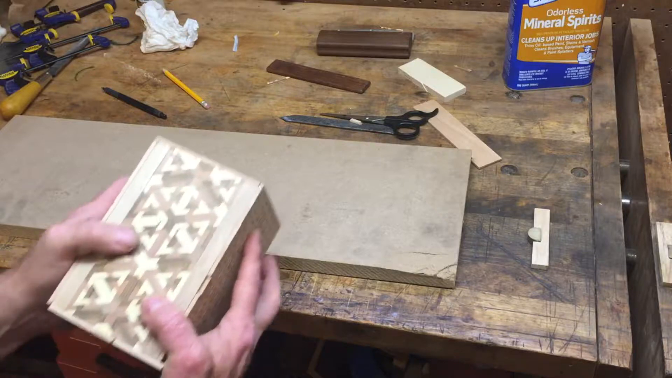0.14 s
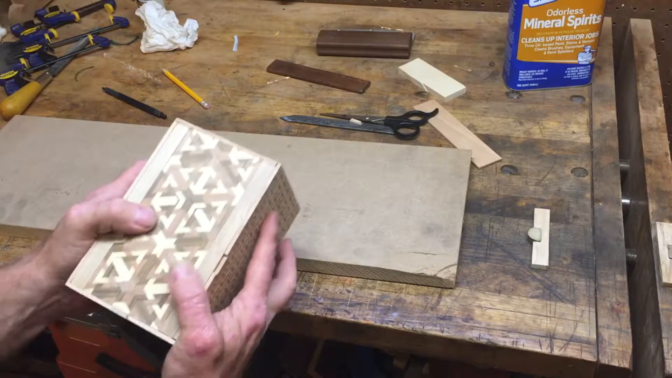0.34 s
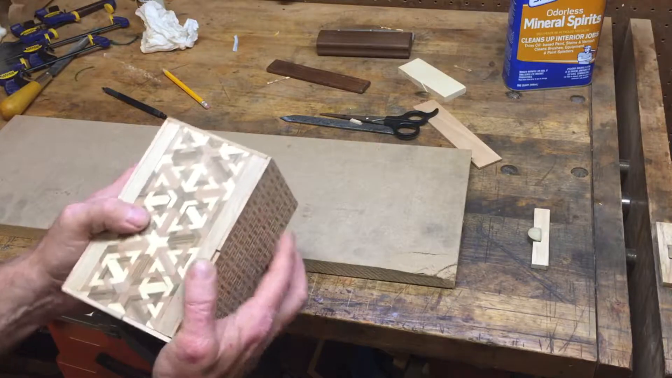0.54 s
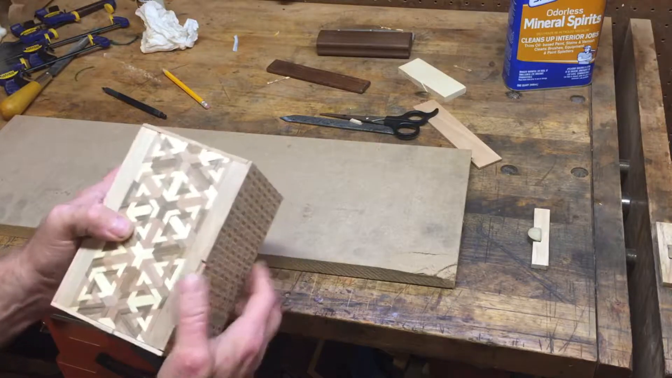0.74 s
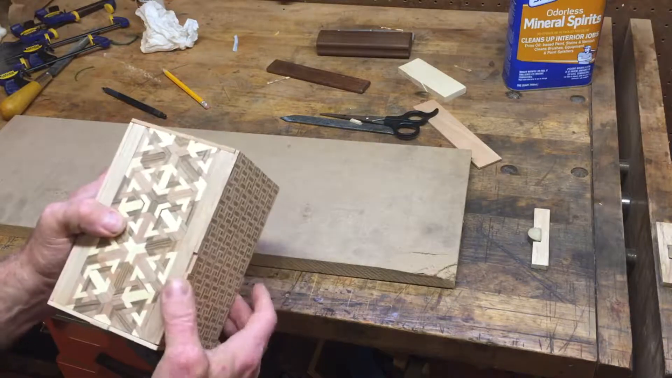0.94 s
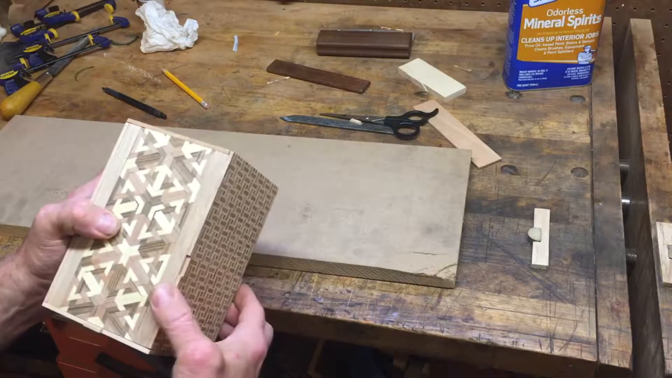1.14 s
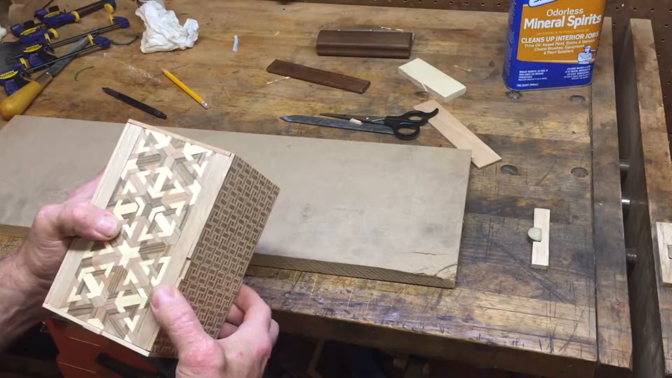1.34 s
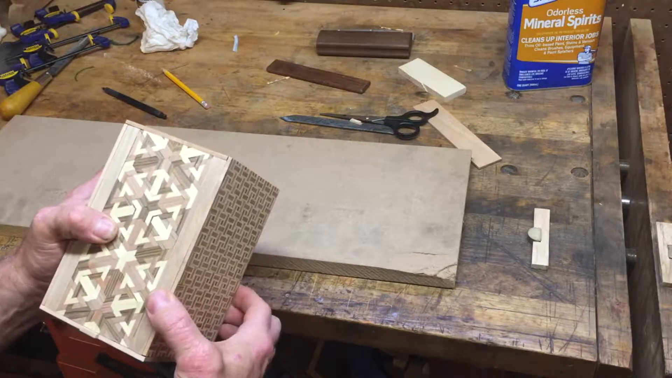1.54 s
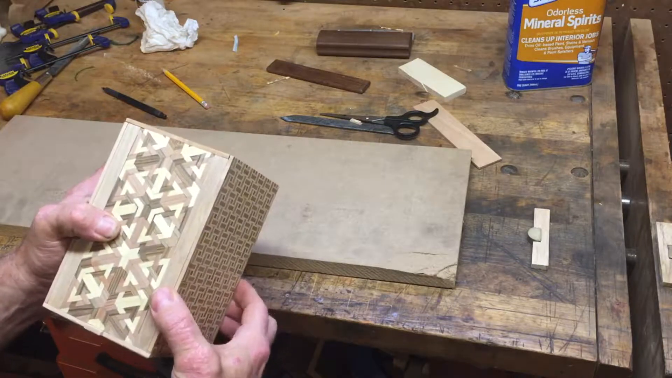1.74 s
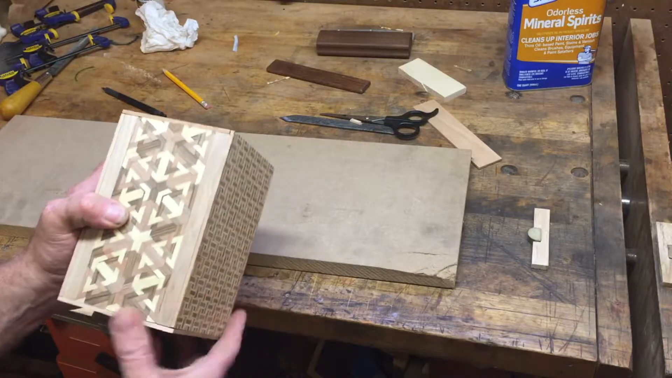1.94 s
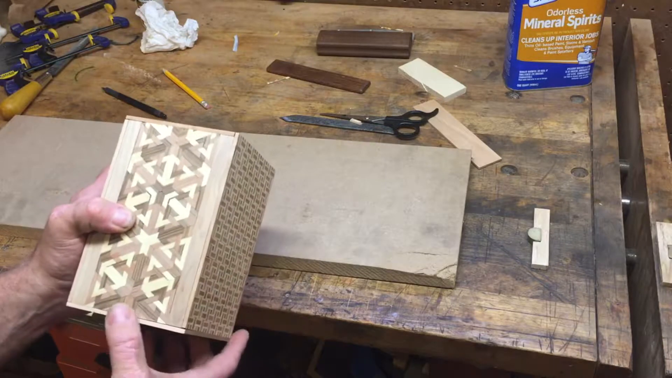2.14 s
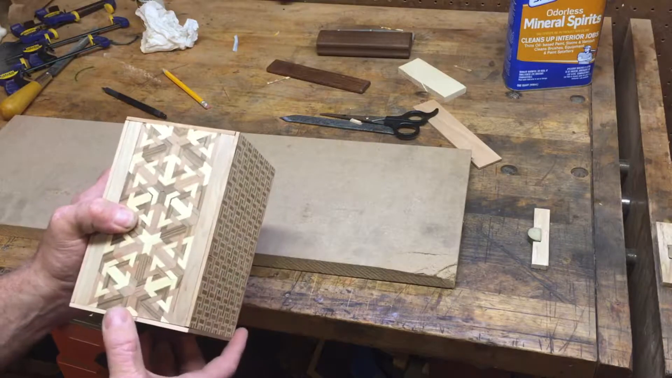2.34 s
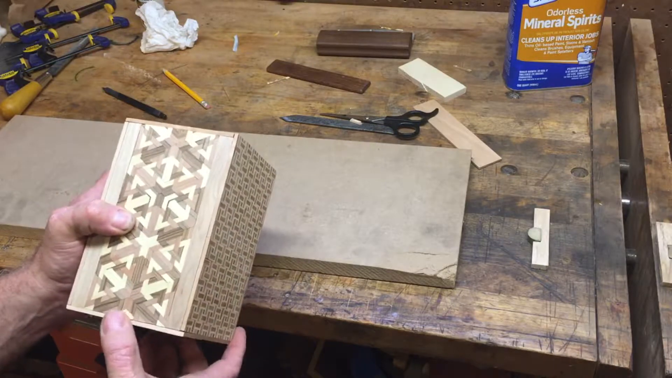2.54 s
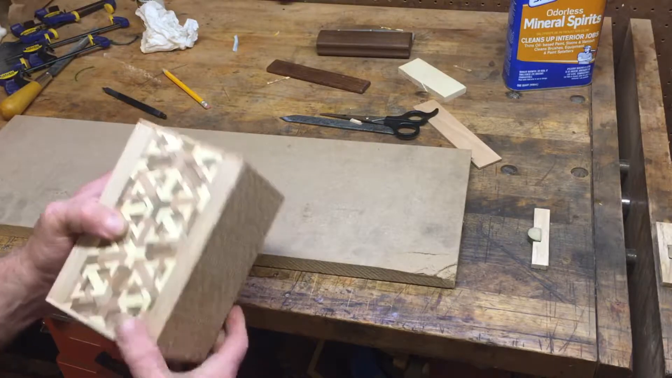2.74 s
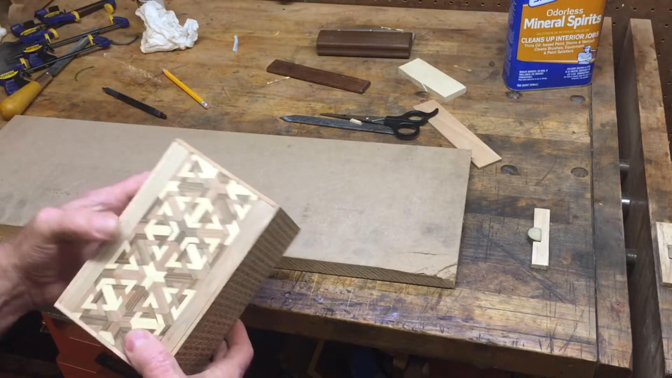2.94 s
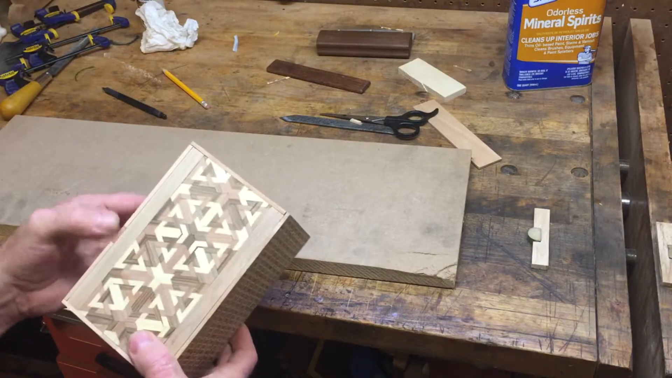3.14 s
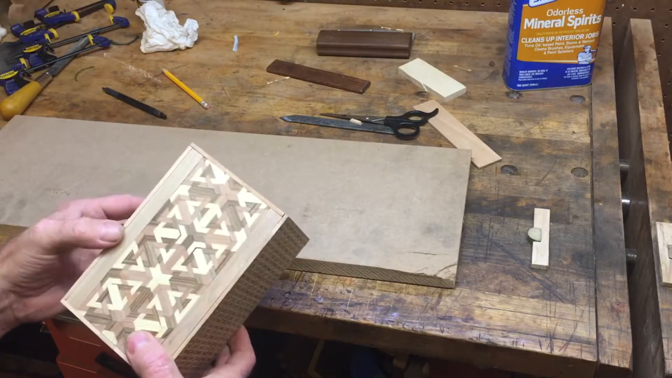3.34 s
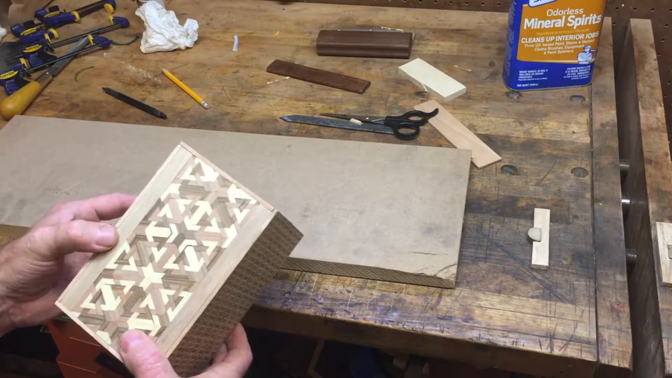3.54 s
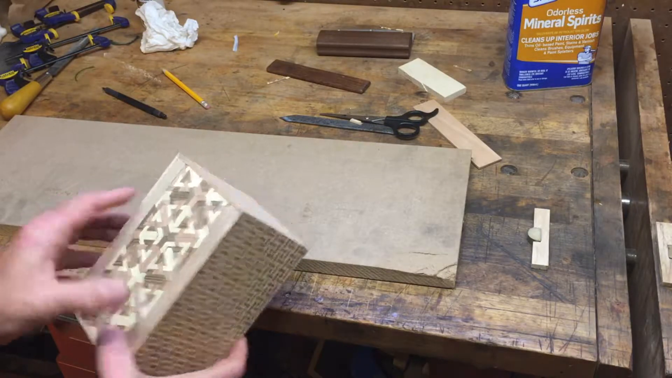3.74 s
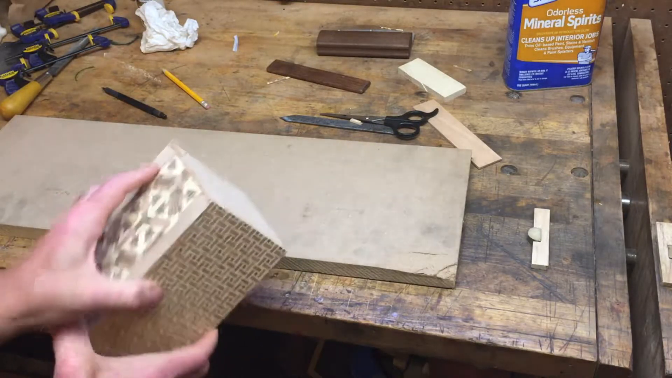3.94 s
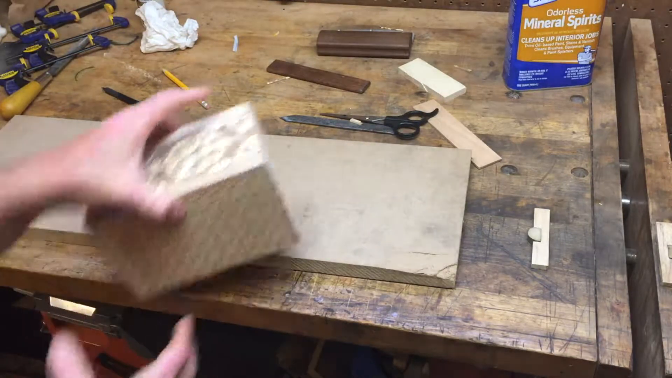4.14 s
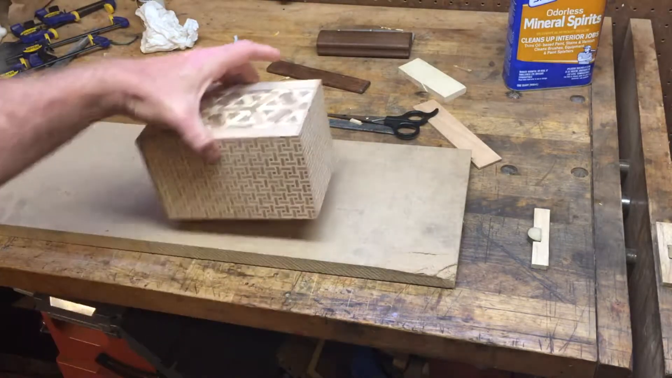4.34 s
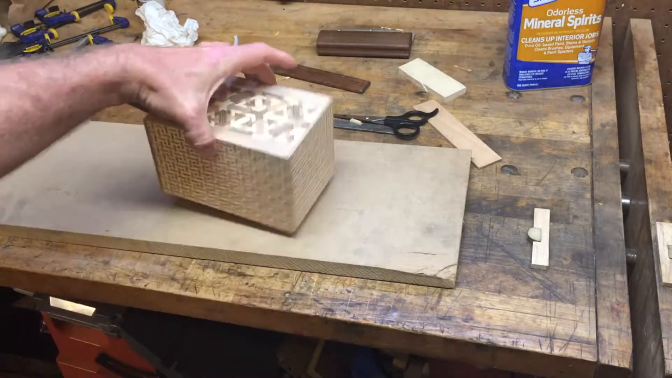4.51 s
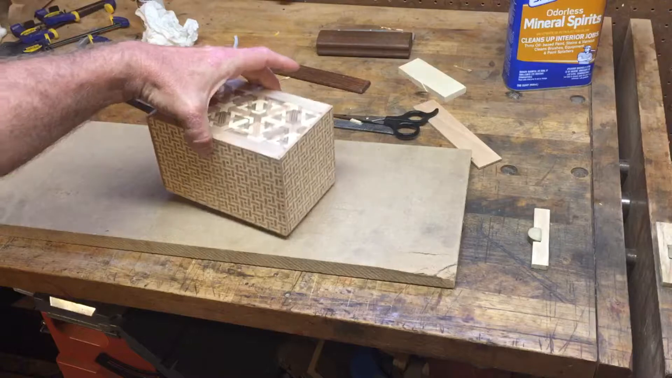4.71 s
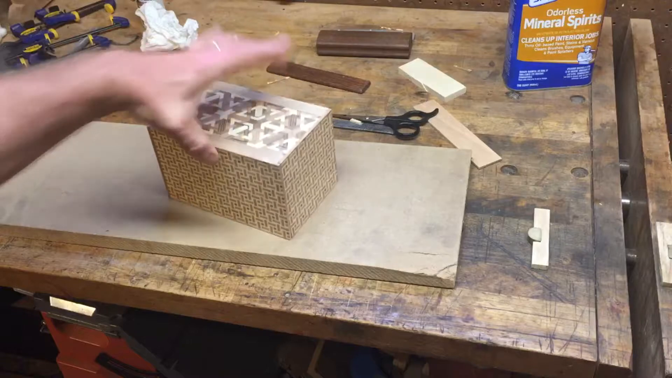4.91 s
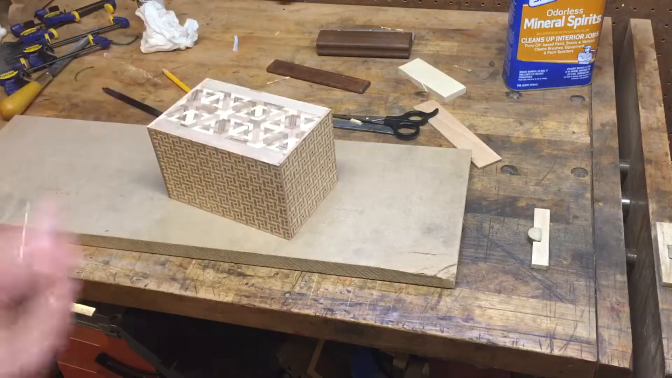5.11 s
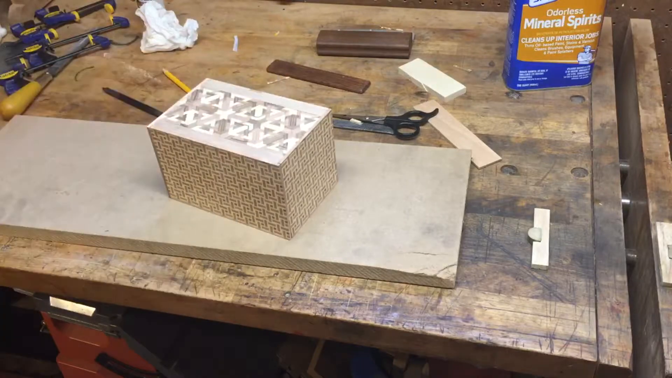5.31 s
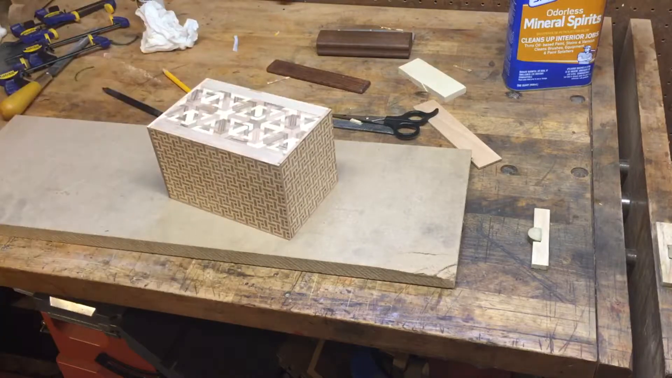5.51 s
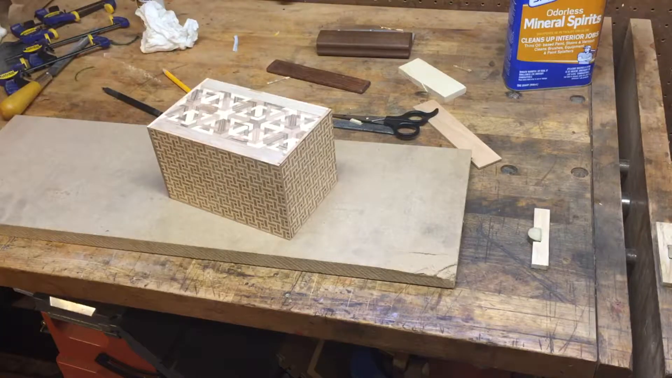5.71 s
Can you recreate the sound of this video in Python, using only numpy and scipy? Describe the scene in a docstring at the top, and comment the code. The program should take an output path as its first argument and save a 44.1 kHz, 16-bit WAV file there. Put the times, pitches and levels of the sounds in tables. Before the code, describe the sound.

Quick wooden clicks and soft finger rubs, then a box knocks twice onto a workbench and a few short scrapes follow.

```python
"""A wooden puzzle box at the workbench

Motors hum and beat faintly in a small workshop. A puzzle box is turned in the hands: fingers and
sliding panels rub by stick-slip friction, and a panel snaps shut, exciting the wood's damped modes.
The box is set down on a board, one corner first, then flat, and the bench rings low beneath it.
A few scuffs and bumps follow nearby."""
import sys
import numpy as np
from scipy import signal
from scipy.fft import rfft, irfft, next_fast_len
from scipy.io import wavfile
from scipy.ndimage import uniform_filter1d, map_coordinates

SR = 44100
rng = np.random.default_rng(int(sys.argv[2]) if len(sys.argv) > 2 else 0)


def digitize_waveform(pressure):
    """Quantize a signal to 16-bit integers and store it at the path in sys.argv[1].

    Rows of a 2-D input are taken as channels; values are limited to [-1, 1].
    """
    field = np.atleast_2d(pressure).T
    bounded = np.clip(field, -1, 1)
    quanta = np.round(bounded * 32767).astype(np.int16)
    wavfile.write(sys.argv[1], SR, quanta)


N = 254456
TIME = np.arange(N) / SR
AFTER = np.arange(SR * 2 // 5) / SR  # seconds since the start of one event

# spectrum of a dull push on wood: frequency_hz, density_db
THUD_SPECTRUM = [(40, -14), (80, -3.5), (160, -0.5), (250, -1), (370, -2.5), (460, -12), (600, 1),
                 (1200, -27.5), (3000, -80)]


def amp(db):
    """Decibels as an amplitude ratio."""
    return 10 ** (np.asarray(db) / 20)


def unit(x, size=None):
    """Normalisation to rms 1, taken over the first size samples or over all of x."""
    return x / np.sqrt(np.mean(x[:size] ** 2) + 1e-20)


def along(points, hz):
    """Interpolation of (frequency, value) points on a logarithmic frequency axis."""
    frequencies, values = np.transpose(points)
    return np.interp(np.log(hz + 1), np.log(frequencies + 1), values)


def filtered(x, response):
    """Linear filtering: the spectrum of x is multiplied by a frequency response."""
    size = next_fast_len(len(x) + 2 ** 11)
    return irfft(rfft(x, size) * response(np.fft.rfftfreq(size, 1 / SR)), size)[:len(x)]


def coloured(x, spectrum):
    """Spectral shaping by a curve in decibels, at rms 1."""
    return unit(filtered(x, lambda hz: amp(along(spectrum, hz))))


def around(centre_hz, octaves):
    """Selective excitation: a contact drives a band of frequencies about a centre."""
    return lambda hz: 1 / (1 + (np.log2((hz + 1) / centre_hz) / octaves) ** 2) ** 2


def motors():
    """Beating: motors just under mains speed give close tones that drift in and out of phase."""
    # motor and mains tones: pitch_hz, level_db
    tones = [(55.77, -70), (58.71, -71), (100.81, -75), (102.9, -79), (111.4, -79), (117.38, -67),
             (119.99, -71)]
    return sum(amp(db) * np.sqrt(2) * np.sin(2 * np.pi * (hz * TIME + rng.random())) for hz, db in tones)


def room_noise(rumble_db=-68, swell_db=2, hiss_db=-73.5):
    """Broadband noise: a rumble under slow amplitude modulation and a steady hiss of air."""
    # low rumble of the room: frequency_hz, density_db
    rumble_spectrum = [(20, -27.5), (32, -9.5), (45, 1), (80, 1.5), (110, 5.5), (165, 0), (195, -2.5),
                       (225, -4), (280, -5), (400, -11.5), (800, -26), (1600, -52)]
    # air noise: frequency_hz, density_db
    hiss_spectrum = [(100, -10), (400, 0), (1000, -2), (2000, -3), (4000, -7), (7000, -10.2),
                     (10500, -14.5), (13000, -13.5), (16000, -14.5)]
    swell = map_coordinates(rng.standard_normal(64), [TIME * 10])  # ten changes a second
    rumble = unit(amp(swell_db * swell) * coloured(rng.standard_normal(N), rumble_spectrum))
    hiss = coloured(rng.standard_normal(N), hiss_spectrum)
    return amp(rumble_db) * rumble + amp(hiss_db) * hiss


def add(track, start_s, sound):
    """Superposition: a sound is summed into the track from start_s on."""
    remaining = track[round(start_s * SR):]
    remaining[:len(sound)] += sound[:len(remaining)]


def workshop(x, wet_db, build_s=0.0036):
    """Reverberation: a diffuse tail builds within milliseconds and decays at each band's own rate."""
    # reverberation time of the room: frequency_hz, t60_s
    decay_times = [(150, 0.21), (500, 0.23), (1200, 0.16), (2500, 0.22), (6000, 0.18), (15000, 0.23)]
    hz, t, bands = signal.stft(rng.standard_normal(len(AFTER)), SR, nperseg=256)
    decay = amp(-60 * t / along(decay_times, hz)[:, None])
    tail = signal.istft(bands * decay, SR, nperseg=256)[1][:len(AFTER)]
    tail *= 1 - np.exp(-(AFTER / build_s) ** 2)
    return x + amp(wet_db) * signal.fftconvolve(x, tail / np.linalg.norm(tail))[:len(x)]


def resonate(x, peaks):
    """Forced vibration: x drives parallel resonances of alternating sign, at rms 1."""
    def response(hz):
        return sum((-1) ** k * amp(db) * 1j * hz * width / (centre ** 2 - hz ** 2 + 1j * hz * width)
                   for k, (centre, width, db) in enumerate(peaks))
    return unit(filtered(x, response))


def friction(strokes, resonances, hiss_spectrum, low_hz, grain_db, clump_db):
    """Stick-slip friction: tiny slips drive the body's resonances and hiss at the surface."""
    out = np.zeros(N)
    for onset_s, rise_s, hold_s, fall_s, db, body_over_hiss_db, tilt_db in strokes:
        start_s = max(onset_s - AFTER[-1] / 3, 0)  # leaves time for the rise
        t = start_s + AFTER - onset_s
        pressure = np.exp(-np.maximum(-t, 0) / rise_s - np.maximum(t - hold_s, 0) / fall_s)
        # the grain catches about once a millisecond, in clumps a few times longer
        grain = unit(uniform_filter1d(rng.standard_normal(len(t)), 40))
        clumps = unit(uniform_filter1d(rng.standard_normal(len(t)), 260))
        slips = amp(grain_db * grain + clump_db * clumps) * rng.standard_normal((2, len(t)))

        def colour(hz):
            """Small parts radiate little bass; a faster, drier stroke is brighter."""
            return hz ** 3 / (hz ** 3 + low_hz ** 3) * amp(tilt_db * np.log2(np.maximum(hz, low_hz)))

        body = unit(filtered(resonate(slips[0], resonances), colour))
        hiss = unit(filtered(coloured(slips[1], hiss_spectrum), colour))
        hiss_db = db - 10 * np.log10(1 + amp(body_over_hiss_db) ** 2)  # the two powers sum to db
        add(out, start_s, pressure * amp(hiss_db) * (amp(body_over_hiss_db) * body + hiss))
    return out


def swells(rows, rise=0.3, hold=0.32, fall=0.36):
    """Stroke envelopes: pressure rises, holds and falls in set shares of each stroke's length."""
    return [(middle_s - hold * length_s / 2, rise * length_s, hold * length_s, fall * length_s, *levels)
            for middle_s, length_s, *levels in rows]


def rubs():
    """Sliding friction: panels run in their grooves and fingers brush the wood."""
    # strokes on the box: middle_s, length_s, level_db, body_over_hiss_db, tilt_db_per_octave
    slides = [(.007, 0.066, -60.5, 6.5, -2.5), (.105, 0.1, -69, 6, 0), (.336, 0.017, -65, 8, 2),
              (.592, 0.079, -64.5, 1.5, -3), (.785, 0.14, -69, -2.5, -6.5), (1.564, .018, -52.5, 1, -3),
              (1.785, .04, -69, -3, -3), (1.804, 0.011, -53, -3, -4), (1.973, 0.062, -64, -9.5, -5),
              (2.409, 0.028, -60, 8, 3), (2.787, 0.056, -51, 9, -2), (2.846, .034, -59.5, 9, -2),
              (2.93, .09, -73.5, -1, -3), (3.583, .019, -68, -8, -4.5), (3.609, 0.0087, -66.5, 10, 1),
              (3.853, 0.045, -72.5, -15, 5), (3.992, 0.058, -58.5, -5.5, -2), (4.064, 0.041, -62, -5, -1.5),
              (4.26, .11, -72, -6, -3.5)]
    # resonances of the rubbed box: centre_hz, width_hz, level_db
    resonances = [(1052, 140, 0), (1230, 95, 4), (1550, 110, 5.5), (1800, 90, 6), (2020, 340, -1.5),
                  (3780, 920, -8.5)]
    # hiss of skin on wood: frequency_hz, density_db
    skin_spectrum = [(880, -49), (1500, -4.5), (1900, -26), (1990, -20.5), (2720, 2), (4940, 2.5),
                     (5340, 5.5), (15500, 0.5)]
    strokes = swells(slides + fidgets())
    rubbing = friction(strokes, resonances, skin_spectrum, low_hz=816, grain_db=1.7, clump_db=0.9)
    return workshop(rubbing, wet_db=-10)


def fidgets(count=7, held_s=(0.9, 4.5), length_s=0.11, level_db=-80.5, scatter_db=4):
    """Light friction: strokes of the shifting grip, loosely spaced while the box is held."""
    body_over_hiss_db, tilt_db_per_octave = -2, -7
    chance = rng.random((count, 2))
    times = np.interp(np.arange(count) + chance[:, 0], [0, count], held_s)
    levels = level_db + scatter_db * (2 * chance[:, 1] - 1)
    return [(s, length_s, db, body_over_hiss_db, tilt_db_per_octave) for s, db in zip(times, levels)]


def clacks(octaves=0.58, contact_s=0.00027, thump_over_ring_db=-18.5, thump_hz=370):
    """Damped impacts: the blows of a panel on its stop, their ringing shortened by the grip."""
    # a panel meets its stop: start_s, ring_db, centre_hz, damping_ratio_to_free_box, crack_over_ring_db
    stops = [(0.3428, -40, 1520, 1.75, -1), (0.3762, -41.5, 1200, 4.1, -32), (1.563, -60, 1370, 2.3, 0.5),
             (1.802, -59, 1290, 1.6, -16)]
    return [(s, db, hz, octaves, damping, contact_s, db + crack_db, db + thump_over_ring_db, thump_hz)
            for s, db, hz, damping, crack_db in stops]


def bounces(blows, delay_s=0.0057, narrowing=0.53, extra_damping=1.3):
    """Inelastic rebound: each blow returns once, weaker and duller."""
    rebounds = []
    for s, ring_db, hz, octaves, damping, contact_s, crack_db, thump_db, thump_hz in blows:
        lower = 2 ** (-0.37 * octaves)  # the broader the contact, the lower the modes struck
        rebounds.append((s + delay_s, ring_db - 6, hz * lower, octaves * narrowing,
                         damping * extra_damping, contact_s, crack_db - 13, thump_db - 12.5,
                         thump_hz * lower))
    return rebounds


def ring(modes, weight, attack_s, scatter_db):
    """Free vibration: a sum of damped modes, each struck with scattered strength and random sign."""
    hz, db, t60 = np.transpose(modes)[:, :, None]
    strength = weight(hz) * amp(db + scatter_db * rng.standard_normal(hz.shape))
    sign = rng.choice([-1, 1], hz.shape)
    swing = np.sin(2 * np.pi * hz * AFTER) * amp(-60 * AFTER / t60)
    return np.sum(strength * sign * swing, axis=0) * (1 - np.exp(-AFTER / attack_s))


def noise_burst(spectrum, t60_s, front_db=-60):
    """An impact transient: one sharp wave front and exponentially decaying noise, coloured alike."""
    puff = rng.standard_normal(len(AFTER)) * amp(-60 * AFTER / t60_s)
    front = signal.unit_impulse(len(AFTER), SR // 2000) * np.linalg.norm(puff)
    return coloured(puff + amp(front_db) * front, spectrum)


def knocks(blows, crack_t60_s=0.027, modes_db=-6, panels_t60_s=0.06):
    """Impact excitation: each blow and its rebound crack at the contact, ring the box and thump."""
    # modes of the box: pitch_hz, level_db, t60_s
    box_modes = [(580, -3, 0.26), (598, -19, 0.09), (645, 13, 0.1), (780, -12, 0.066), (861, 1.5, 0.16),
                 (950, -11.5, 0.16), (1124, -0.5, 0.063), (1140, -7, .13), (1338, 5.5, 0.041),
                 (1400, -3.5, 0.1), (1587, -11, 0.14), (1730, -15, 0.11), (1860, -4.5, 0.33),
                 (1778, 11, 0.097), (2160, -10, 0.35), (2134, -2.5, 0.27), (2423, -4, 0.12),
                 (2200, -32, 0.11), (2600, 0, .13), (3100, -18.5, 0.18)]
    # short-lived panel modes that overlap into one band: frequency_hz, density_db
    panel_spectrum = [(300, -25), (450, -10.5), (600, -4.5), (1000, 0.5), (1300, 2.5), (1600, -6),
                      (2350, 0.5), (2700, -4), (3200, -18), (4000, -16.5), (4900, -33), (9000, -54.5)]
    # crack of the contact: frequency_hz, density_db
    crack_spectrum = [(300, -39), (900, -9), (2000, 1), (3900, -1.5), (4900, -7.5), (5700, -5), (8500, -11),
                      (10500, -16), (16000, -21)]
    out = np.zeros(N)
    for blow in blows + bounces(blows):
        start_s, ring_db, centre_hz, octaves, damping, contact_s, crack_db, thump_db, thump_hz = blow
        struck = around(centre_hz, octaves)  # place and hardness of the contact select the modes
        damped = [(hz, db, t60 / damping) for hz, db, t60 in box_modes]
        modes = unit(ring(damped, struck, contact_s, scatter_db=4.5), size=882)
        panels = filtered(noise_burst(panel_spectrum, panels_t60_s / damping, front_db=-10), struck)
        blur = unit(panels * (1 - np.exp(-AFTER / contact_s)), size=441)
        wood = unit(amp(modes_db) * workshop(modes, wet_db=-13) + workshop(blur, wet_db=-7), size=441)
        crack = unit(noise_burst(crack_spectrum, crack_t60_s, front_db=-10), size=441)
        crack = workshop(crack, wet_db=-5.5)
        add(out, start_s, amp(ring_db) * wood + amp(crack_db) * crack + amp(thump_db) * thump(thump_hz))
    return out


def push(weight, t60_s, rise_s):
    """Soft contact: a force that builds gradually gives a dull thud without a sharp edge."""
    thud = filtered(noise_burst(THUD_SPECTRUM, t60_s), weight)
    return unit(thud * (1 - np.exp(-AFTER / rise_s)), size=1764)


def thump(centre_hz, octaves=1.55, push_db=-3):
    """Inertia: the heavy bench takes milliseconds to get going, then rings in its low modes."""
    # modes of the board and bench: pitch_hz, level_db, t60_s
    bench_modes = [(94.5, -3, .2), (117, 1, 0.17), (142, -7, 0.34), (209.5, -1.5, 0.26), (226.3, -7, 0.42),
                   (274, 0, 0.075), (309.7, -9.5, 0.39), (350.5, -3.5, 0.22), (375, 5.5, 0.07),
                   (437, -27, 0.16), (523, 1.5, 0.091)]
    struck = around(centre_hz, octaves)
    modes = unit(ring(bench_modes, struck, attack_s=0.0063, scatter_db=-1), size=1764)
    return unit(modes + amp(push_db) * push(struck, t60_s=0.2, rise_s=0.0015), size=1764)


def nudges():
    """Low-frequency excitation: soft fingers push the box and drive only a narrow, low band."""
    # pushes of the fingers: start_s, level_db, centre_hz
    touches = [(.985, -59.5, 84), (1.221, -60, 150), (1.863, -63, 175), (2.018, -56.5, 99),
               (2.838, -64, 202)]
    out = np.zeros(N)
    for start_s, db, centre_hz in touches:
        add(out, start_s, amp(db) * push(around(centre_hz, octaves=0.24), t60_s=0.11, rise_s=0.0085))
    return out


def landings(hard_db=-28, hard_contact_s=0.00035, thump_over_ring_db=-9):
    """Contact area and time: flatter blows ring more modes, more freely; harder ones are briefer."""
    # the box meets the board: start_s, ring_db, centre_hz, flatness (0 a corner, 1 the whole base)
    touchdowns = [(4.6075, -34, 1300, 0.062), (4.715, -58.5, 596, 0.63), (4.8344, -25.5, 1170, 0.9)]
    blows = []
    for start_s, db, centre_hz, flatness in touchdowns:
        octaves = np.interp(flatness, [0, 1], [0.3, 2.28])
        damping = np.interp(flatness, [0, 1], [2.2, 1.35])
        thump_hz = np.interp(flatness, [0, 1], [225, 283])
        crack_db = db + np.interp(flatness, [0, 1], [-10.5, -17.5])
        thump_db = db + thump_over_ring_db
        contact_s = hard_contact_s * amp(hard_db - db)
        blows.append((start_s, db, centre_hz, octaves, damping, contact_s, crack_db, thump_db, thump_hz))
    return blows


def scuffs(attack_s=0.00098, hold=0.44, bump_hz=216):
    """Impact, then friction: rough scrapes beside the bench start with a soft bump; some drag on."""
    # sudden scrapes: start_s, length_s, level_db, body_over_hiss_db, tilt_db_per_octave, bump_db
    scrapes = [(5.2713, 0.018, -46, -11.5, -0.5, -62.5), (5.35, 0.04, -42.5, 21, 3, -57),
               (5.593, 0.034, -40, 5, -4.5, -49.5)]
    # drags after a scrape: middle_s, length_s, level_db, body_over_hiss_db, tilt_db_per_octave
    drags = [(5.416, .032, -50, 6, -1), (5.69, 0.074, -51.5, -7.5, 1.2)]
    # resonances of the scraped body: centre_hz, width_hz, level_db
    resonances = [(446, 91, -18), (597, 52, 0.5), (866, 136, -6), (1127, 107, 2), (1710, 230, -6.5),
                  (2410, 356, -5), (3340, 290, -10), (3820, 300, -15)]
    # hiss of the scraped surface: frequency_hz, density_db
    hiss_spectrum = [(880, -13), (1500, -2), (3150, -6), (3800, -3.5), (4390, -9), (7820, -14), (9230, -15),
                     (9990, -23.5), (11800, -19), (15500, -27)]
    strokes = [(start_s, attack_s, hold * length_s, (1 - hold) * length_s, *levels)
               for start_s, length_s, *levels, _ in scrapes] + swells(drags)
    scraping = friction(strokes, resonances, hiss_spectrum, low_hz=276, grain_db=3.5, clump_db=-1.1)
    out = workshop(scraping, wet_db=-8)
    for start_s, *_, bump_db in scrapes:
        add(out, start_s, amp(bump_db) * thump(bump_hz, octaves=0.77))
    return out


def scene():
    """Superposition: the pressures of all sources add at one point above the bench."""
    return (knocks(clacks() + landings()) + rubs() + nudges() + scuffs() + motors() + room_noise())[None]


def record(dry, top_hz=15900):
    """Band limiting: an ideal low-pass filter removes everything above top_hz."""
    return np.array([filtered(x, lambda hz: hz < top_hz) for x in dry])


dry = scene()
out = record(dry)
digitize_waveform(out)
```